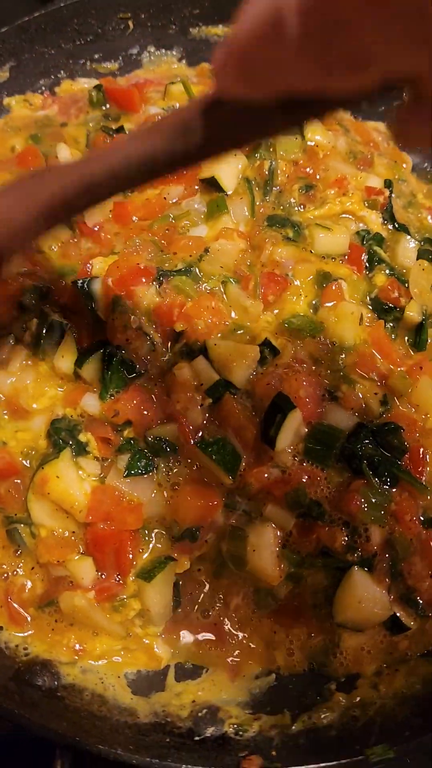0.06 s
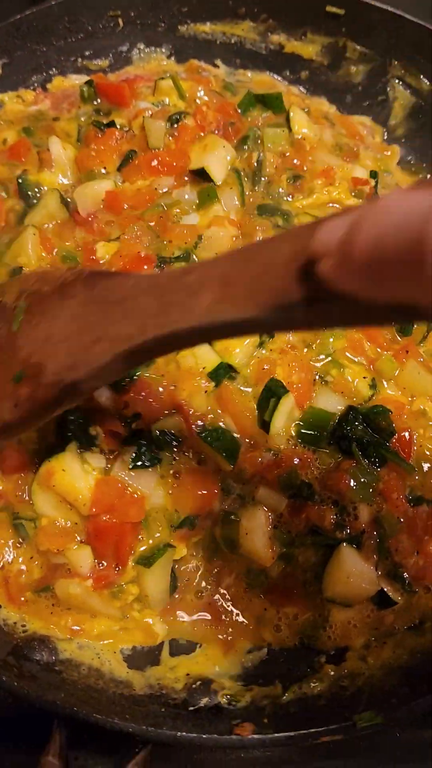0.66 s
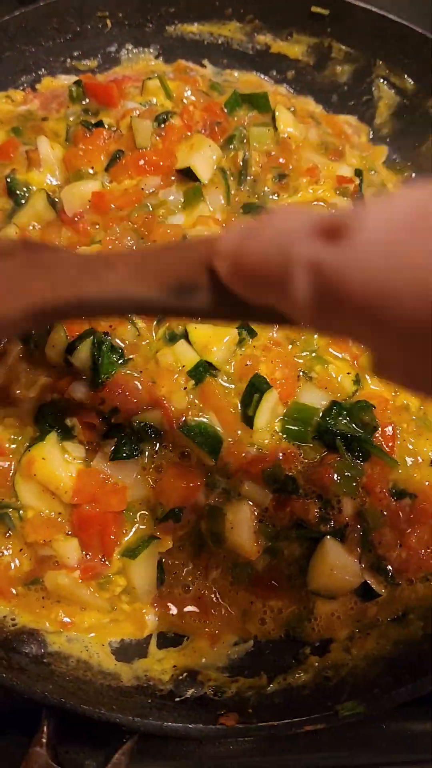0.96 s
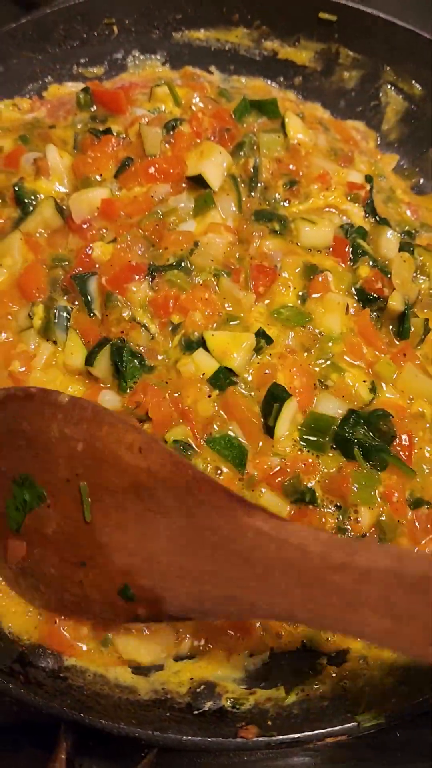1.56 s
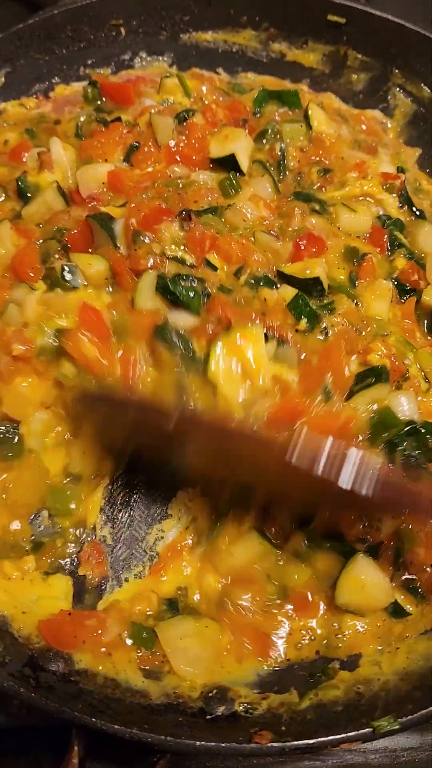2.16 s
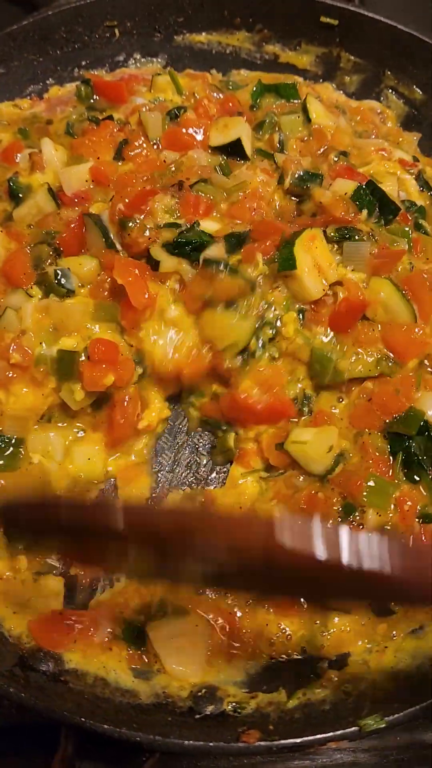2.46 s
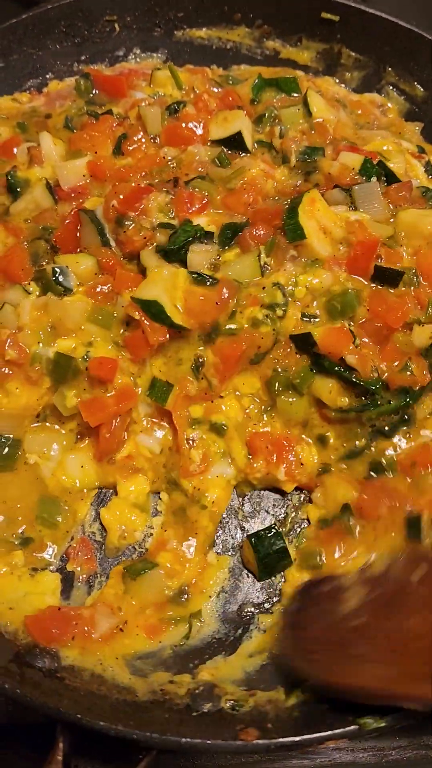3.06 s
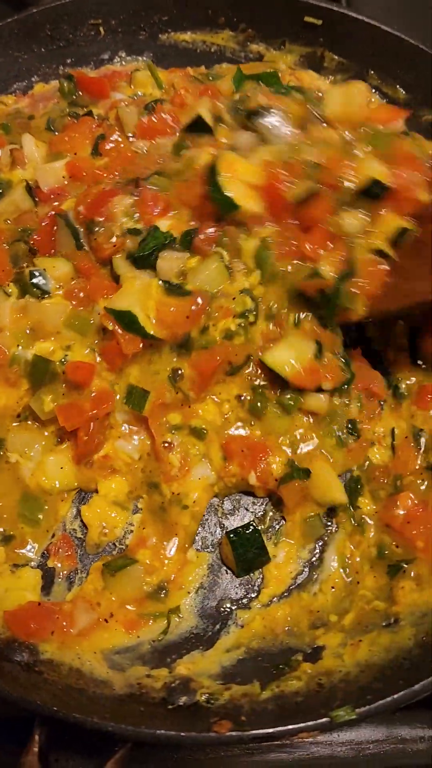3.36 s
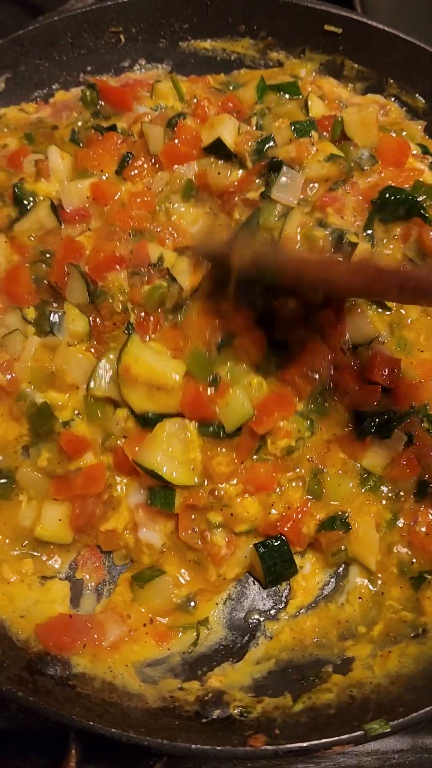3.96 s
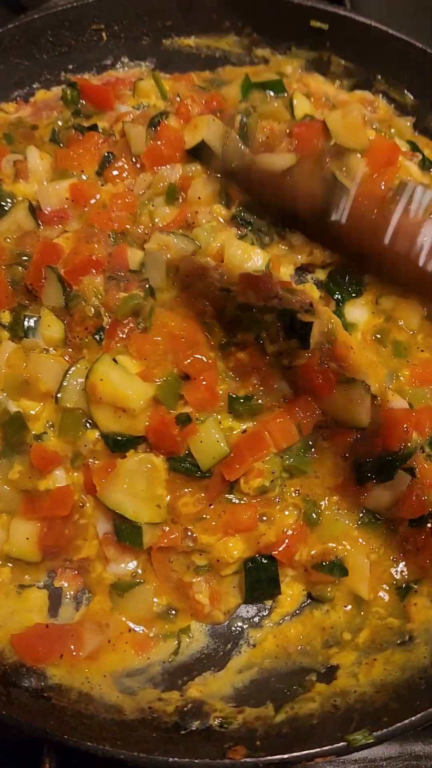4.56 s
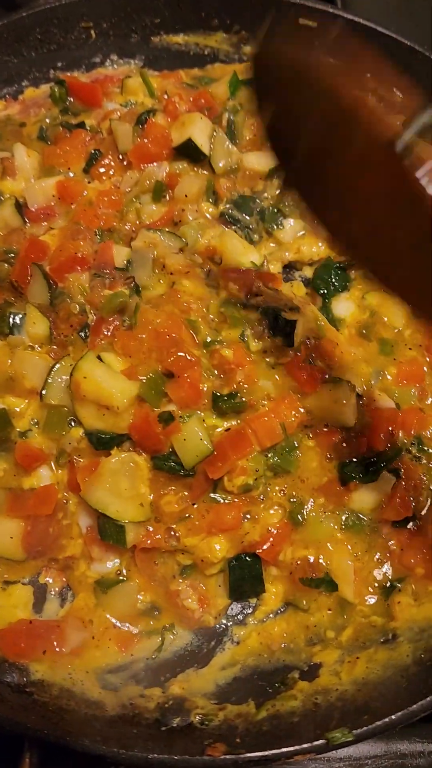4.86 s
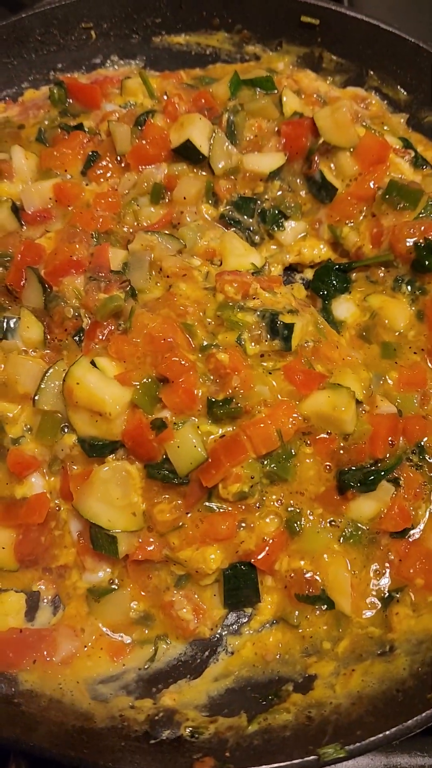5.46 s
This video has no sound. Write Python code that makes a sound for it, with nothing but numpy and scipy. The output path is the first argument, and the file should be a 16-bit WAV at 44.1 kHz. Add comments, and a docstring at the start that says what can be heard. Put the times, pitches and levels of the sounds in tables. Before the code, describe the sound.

Eggs and vegetables sizzle faintly in a frying pan throughout, heard close up in a small kitchen over a low rumble. A wooden spoon thuds dully on the pan floor at the very start and at 0.4 seconds, then more firmly at 0.9. From about 1.3 to 2.9 seconds it scrapes through the food in short strokes, strongest near 2.2, with wet smacks, small rasping catches and brief flares of fizz. Two sharp, loud clacks of wood on the pan stand out at 2.5 and 3 seconds, the second brighter. A short squelch sinks in pitch around 3.2 seconds, and a muffled thud follows at 3.8. From 4 seconds on it is quieter, with soft sputters of steam and tiny bubble pops in the sizzle. At about 5.5 seconds the spoon lands on a hard surface beside the pan with a quick, loud clatter.

```python
"""Stirring eggs in a frying pan

A wooden spoon stirs eggs and vegetables, heard close up in a small kitchen. Its impacts excite damped
modes: it thuds on the pan floor, clacks on the rim and finally clatters down beside the pan. Stick-slip
friction makes it scrape and squelch through the food. Bursting bubbles give a faint sizzle that flares
where egg is pushed onto bare metal, and steam escapes in short sputters over a low rumble."""
import sys
import numpy as np
from scipy import signal
from scipy.fft import rfft, irfft, next_fast_len
from scipy.io import wavfile
from scipy.ndimage import uniform_filter1d, minimum_filter1d

SR = 44100
rng = np.random.default_rng(int(sys.argv[2]) if len(sys.argv) > 2 else 0)


def inscribe(sig):
    """Save sig as 16-bit PCM at rate SR to the path in sys.argv[1].

    A 1-D sig is mono; a 2-D sig holds one channel per row.
    Samples are clipped to [-1, 1] before scaling.
    """
    pcm = np.round(np.clip(np.atleast_2d(sig).T, -1, 1) * 32767)
    wavfile.write(sys.argv[1], SR, pcm.astype(np.int16))


N = 247380

# Blows of the spoon: (time [s], floor level [dB], wall level [dB], spoon level [dB], low-pass [Hz],
# high-pass [Hz], left minus right [dB], right lag [s], scatter gain [dB], pan pitch [ratio])
BLOWS = [(0.005, -22.5, -33, -39, 726, 117, -2.5, 0.00026, -0.5, .95),
         (0.449, -25, -61, -48, 564, 124, -2.5, 0.0003, 0, 1.06),
         (0.9, -18, -22.5, -22, 1694, 158, 0.5, 0.00016, -2.5, 0.99),
         (2.5368, -21.5, -16.5, -13.5, 2620, 236, 1, 0.00042, -6, 1.022),
         (2.9829, -22.5, -20, -5, 7200, 91, -6, 0.00037, -6.5, 0.77),
         (3.7886, -21.5, -27.5, -40.5, 852, 620, -4.5, 0.00033, -7.5, 0.98)]
# Modes of the food-damped pan floor, the pan wall and the spoon: (frequency [Hz], level [dB], T60 [s])
FLOOR_MODES = [(184, 3, 0.01), (431, 0.5, 0.012), (744, -2, 0.011), (160, -29, 0.16), (275, -23, 0.11),
               (365, -20, 0.075), (500, -21, 0.06), (650, -21, 0.05), (760, -21, 0.06), (1130, -26, 0.06)]
WALL_MODES = [(620, -16, 0.06), (925, 0.5, 0.022), (1138, 4, 0.017), (1550, 2.5, 0.011), (1950, -23, 0.065)]
SPOON_MODES = [(1745, -7, 0.048), (2050, 7.5, 0.0068), (2380, 8, 0.0076), (3167, 0.5, 0.014),
               (4250, 5.5, 0.0037), (5140, -10.5, 0.011), (6680, 4.5, 0.0019), (7560, -20, .007)]
# Early reflections from hob and walls: (delay [s], gain [ratio])
REFLECTIONS = [(.0048, 0.046), (0.019, 0.63), (0.0239, 0.2)]
def knocks(thud_t60=0.12, clack_t60=0.052):
    """Impact excitation: each blow rings pan floor, pan wall and spoon, and scatters around the stove."""
    out, echoes = np.zeros((2, 2, N))
    for s, floor_db, wall_db, wood_db, hard_hz, low_hz, side_db, lag, scatter_db, pan_pitch in BLOWS:
        parts = (FLOOR_MODES, floor_db, pan_pitch), (WALL_MODES, wall_db, pan_pitch)
        parts += ((SPOON_MODES, wood_db, 1),)
        blow = sum(amp(db) * ring(modes, hard_hz, low_hz, pitch) for modes, db, pitch in parts)
        blow = stereo(blow, lag)
        scatter = convolve(blow, diffuse_tail([(500, thud_t60), (2200, clack_t60)], size=9000))
        add(out, s, blow * amp([[side_db / 2], [-side_db / 2]]) + amp(scatter_db) * scatter)
    dull = cut(out, 1200, "low", order=3)
    for s, gain in REFLECTIONS:
        add(echoes, s, gain * dull)
    return out + echoes


# Contacts of the dropped spoon: (time [s], level [dB], low-pass [Hz], high-pass [Hz])
REBOUNDS = [(5.5374, -21.5, 1070, 620), (5.545, -14, 6300, 393), (5.558, -18.5, 3370, 149),
            (5.5751, -23.5, 1970, 170), (5.582, -24, 2900, 170)]
# Modes of the hard surface beside the pan: (frequency [Hz], level [dB], T60 [s])
SURFACE_MODES = [(170, -15.5, 0.13), (345, -7.5, 0.052), (640, -5, 0.019), (804, -3, 0.014),
                 (1050, -2.5, 0.0088), (1600, -8.5, 0.024), (2430, -6, 0.011), (3200, -5.5, 0.018),
                 (4160, -2, 0.0077), (5450, 0.5, 0.0037), (7800, 3.5, 0.00096)]
def clatter(scatter_db=-2, scatter_t60=0.13):
    """Rebound: the dropped spoon lands on tip and handle, and each contact rings the surface."""
    out = np.zeros((2, N))
    for s, db, hard_hz, low_hz in REBOUNDS:
        add(out, s, amp(db) * stereo(ring(SURFACE_MODES, hard_hz, low_hz), lag=0.00011))
    return out + amp(scatter_db) * convolve(out, diffuse_tail([(1, scatter_t60)], size=9000))


# Strokes: (time of strongest slip [s], rise [s], fall [s], push [dB], rub [dB], rasp [dB])
STIRS = [(0.636, 0.031, 0.024, -47.5, -54.5, -72), (1.29, 0.11, 0.11, -56, -64, -63.5),
         (1.551, 0.0078, 0.073, -55.5, -88, -64), (1.758, 0.061, 0.073, -52, -45, -51.5),
         (1.97, 0.078, .09, -85, -61.5, -58), (2.209, 0.042, 0.027, -47.5, -32, -37.5),
         (2.338, 0.032, 0.045, -88, -61.5, -52.5), (2.68, 0.061, 0.018, -49.5, -43, -45),
         (3.171, 0.079, 0.11, -49.5, -47.5, -45.5), (4.337, 0.074, 0.09, -66.5, -63, -60.5)]
# Spectra of the push on the pan, the rub on its floor and the wood's rasp: (frequency [Hz], level [dB])
PUSH_SPECTRUM = [(60, -20.5), (150, -1.5), (260, -3.5), (360, -7), (520, -13), (1000, -35)]
RUB_SPECTRUM = [(150, -38.5), (350, -5), (500, -2.5), (690, -3), (900, -13.5), (1300, -5.5), (3500, -51)]
RASP_SPECTRUM = [(400, -33), (1100, -13.5), (1700, -7), (2250, 0), (2800, -14), (4200, -14.5),
                 (7000, -21.5), (11000, -34.5)]
def scrapes(ring_db=-8, push_lead_s=0.033):
    """Stick-slip friction: heavy slips shake the pan, fine ones rasp in the spoon."""
    push_gain, rub_gain, rasp_gain = np.zeros((3, N))
    for s, rise, fall, push_db, rub_db, rasp_db in STIRS:
        force = swell(s, rise, fall)
        leaning = swell(s - push_lead_s, rise, fall)  # the spoon leans on the pan before it slips
        push_gain += amp(push_db) * leaning ** 0.94
        rub_gain += amp(rub_db) * force ** 1.39
        rasp_gain += amp(rasp_db) * force ** 0.97
    push = unit_rms(colour(stereo(clicks(350, 2.5)), PUSH_SPECTRUM))
    slips = stereo(clicks(700, 0.84))
    pan_ring = unit_rms(convolve(slips, ring(FLOOR_MODES, 2500, 1300)))
    rub = unit_rms(unit_rms(colour(slips, RUB_SPECTRUM)) + amp(ring_db) * pan_ring)
    shared, left, right = (clicks(1600, 2.7) for _ in range(3))
    grit = colour(stereo(shared, lag=0.000405) + np.array([left, right]), RASP_SPECTRUM)
    rasp = unit_rms(grit * flicker(3.2, 90))
    return push_gain * push + rub_gain * rub + rasp_gain * rasp


# Wet smacks and bursting bubbles: (time [s], relative level [dB], treble setting [dB])
SMACKS = [(0.075, -32.5, -16.5), (0.158, -26.5, -16), (0.206, -33, -17), (0.403, -39.5, -24),
          (0.447, -31, 18), (0.902, -28.5, -21), (1.1367, -34.5, 7), (1.485, -52, 4), (2.034, -33, -16),
          (2.0928, -33, -7), (2.1417, -18, 5), (2.533, -31, -5), (2.5362, -20, -26.5), (3.462, -40, -12),
          (3.53, -39, -10), (4.05, -42, -29), (4.589, -38, -6), (4.6168, -37.5, -6.5),
          (5.0936, -42.5, -3.5), (5.384, -45, -8)]
def smacks(gain_db=4, length_s=0.011):
    """Impulsive release: wet food smacks and single bubbles burst, each a broadband pulse."""
    out = np.zeros((2, N))
    for s, db, treble_db in SMACKS:
        spectrum = [(300, -6), (1400, -7), (2250, -6.5), (3500, -7.5),
                    (6000, treble_db + 13), (10000, 1.13 * treble_db), (15000, 1.2 * treble_db)]
        add(out, s, amp(db + gain_db) * snap(length_s, spectrum, spray=0.18))
    return out


# Catches of the spoon's edge: (time [s], relative level [dB], length [s], rasp pitch [ratio])
EDGE_CATCHES = [(1.485, -42.5, 0.0075, 1.1), (1.524, -43, 0.048, 1.26), (2.41, -33, 0.029, 1.09),
                (2.654, -43, 0.009, 1.1), (2.673, -26.5, 0.012, 0.85), (2.702, -30.5, 0.011, 1.56),
                (2.754, -42, 0.007, 1.4), (2.813, -36.5, 0.004, 1.1), (2.846, -35, 0.009, 1.14),
                (2.894, -35, 0.0086, 1.1), (3.38, -38, 0.007, 0.73), (3.406, -40, 0.0068, 0.83),
                (3.567, -47, 0.022, 1.1)]
def catches(gain_db=3):
    """Static friction: the spoon's edge catches on the metal and breaks free with a brief rasp."""
    out = np.zeros((2, N))
    for s, db, length, pitch in EDGE_CATCHES:
        spectrum = [(hz * pitch, level) for hz, level in RASP_SPECTRUM]
        add(out, s, amp(db + gain_db) * snap(length, spectrum, spray=0.99))
    return out


# Course of the wet pocket between spoon and pan wall: (time [s], resonance [Hz], level [dB])
POCKET_GLIDE = [(3.07, 2450, -69), (3.095, 2380, -52), (3.135, 2130, -46), (3.18, 1760, -39),
                (3.215, 1800, -53.5), (3.275, 2050, -53), (3.315, 1585, -49), (3.361, 1550, -80)]
def squelch(width_hz=520, stereo_spread=0.56):
    """Cavity resonance: fine wet slips ring a pocket that sinks in pitch as it widens."""
    t = np.arange(N) / SR
    s, hz, db = np.transpose(POCKET_GLIDE)
    shared, left, right = (clicks(1500, 1.5) for _ in range(3))
    slips = stereo(shared, lag=0.00039) + stereo_spread * np.array([left, right])
    pitch = np.interp(t, s, hz) * flicker(0.35, 70)
    pocket = resonate(resonate(slips, pitch, width_hz), pitch, width_hz)
    return amp(np.interp(t, s, db, -np.inf, -np.inf)) * unit_rms(pocket)


# Wet egg pressed onto hot metal: (time [s], rise [s], hold [s], drying time [s], level [dB])
FLARE_UPS = [(0.064, 0.075, 0.083, .07, -49), (0.442, 0.0033, 0.034, .02, -50.5),
             (0.576, 0.025, 0.04, .12, -53.5), (0.914, 0.024, 0.24, .1, -55.5),
             (1.216, 0.051, 0.046, .035, -47.5), (1.365, .015, 0.022, .012, -52),
             (1.475, .01, 0.25, .05, -54.5), (1.708, 0.028, 0.078, .05, -45.5),
             (1.842, 0.043, 0.11, .13, -51.5), (2.095, 0.0074, .13, .11, -47.5),
             (2.528, 0.0055, 0.11, .02, -55), (2.61, 0.05, 0.046, .03, -47),
             (2.752, 0.0288, 0.15, .03, -60.5), (3.072, 0.044, 0.029, .05, -48.5),
             (3.747, 0.016, 0.084, .04, -48.5)]
# Steam forced through the egg: (time [s], half length [s], ring [dB], fizz [dB], vent pitch [ratio])
STEAM_PUFFS = [(1.609, 0.011, -55, -62, 0.99), (4.071, 0.0082, -44.5, -54, 1.01),
               (4.131, 0.022, -63, -62, 1.12), (4.234, 0.013, -56.5, -68, 0.94),
               (4.281, 0.03, -55.5, -64, .98), (4.385, 0.043, -59.5, -59.5, 1.05),
               (4.503, 0.041, -62, -57.5, .98), (4.717, 0.028, -62.5, -59, .98),
               (4.924, 0.034, -64, -63, 1.02), (5.222, 0.033, -69, -67, 0.97)]
# Hollow modes of the steam vents: (frequency [Hz], level [dB], T60 [s])
VENT_MODES = [(2420, -4, 0.026), (3320, 1, 0.019), (4490, -1, 0.012), (5780, 3.5, 0.007), (7410, 5, 0.009)]
# Filters for the steady simmer and the flaring fizz: (frequency [Hz], level [dB])
SIMMER_SPECTRUM = [(700, 1.5), (1500, -7), (2200, -1.5), (3800, -4.5), (6200, 1.5), (8300, -3.5),
                   (10200, -14.5), (12500, -10.5), (16000, -16.5)]
FIZZ_SPECTRUM = [(700, -17), (2150, -1), (3700, -7), (6300, -2.5), (7500, -3.5), (10000, -16.5),
                 (12500, -10), (15500, -13.5)]
# Brief dips in the sizzle: (time [s], half length [s], gain [dB])
SIZZLE_DIPS = [(0.835, 0.043, -8), (1.453, 0.014, -1.5), (2.095, 0.01, -4), (2.5, 0.033, -7),
               (3.98, 0.012, -1.5)]
def frying(simmer_db=-60.5):
    """Boiling: bubbles burst steadily, wet egg flares on hot metal, and escaping steam rings its vents."""
    t = np.arange(N) / SR
    fizz_gain, vents = np.zeros(N), np.zeros((2, N))
    for s, rise, hold, drying, db in FLARE_UPS:
        wetting = np.clip((t - s) / rise, 0, 1)
        fizz_gain += amp(db) * wetting * np.exp(-np.maximum(t - s - rise - hold, 0) / drying)
    spit = bubbles(9000, 2, cycles=1)
    for s, half_length, vent_db, fizz_db, pitch in STEAM_PUFFS:
        steam = plateau(s, half_length)
        fizz_gain += amp(fizz_db) * steam
        hollow = convolve(spit, ring(VENT_MODES, 8500, 2300, pitch, size=2000))
        vents += amp(vent_db) * steam * unit_rms(hollow)
    simmer = colour(bubbles(14000, 2.9, cycles=1.5), SIMMER_SPECTRUM)
    simmer = unit_rms(clustered(simmer, 1.4) * flicker(1, 20))
    fizz = colour(bubbles(14000, 3, cycles=2.5), FIZZ_SPECTRUM)
    fizz = unit_rms(clustered(fizz, 2.8) * flicker(1.5, 70))
    lull = amp(sum(db * plateau(s, half_length) for s, half_length, db in SIZZLE_DIPS))
    return lull * (amp(simmer_db) * simmer + fizz_gain * fizz) + vents


def bubbles(per_s, spread_db, cycles, pitches=20):
    """Damped oscillation: tiny random bursts of many pitches, each falling to 1/e in the given cycles."""
    t, out = np.arange(200) / SR, np.zeros((2, N))
    for hz in np.geomspace(1300, 15500, pitches):
        phase = rng.uniform(-2.93, 2.82, (2, 1))
        burst = hz * np.exp(-hz * t / cycles) * np.cos(2 * np.pi * hz * t + phase)
        out += signal.oaconvolve(clicks(per_s / pitches, spread_db)[None], burst, axes=1)[:, :N]
    return unit_rms(out)


def clustered(x, depth_db, size=8):
    """Band modulation: bubbles of like size burst together, in patches of roughly 1 kHz by 25 ms."""
    spectra = signal.stft(x, nperseg=256)[2]
    noise = rng.standard_normal(spectra.shape[1:])
    patches = unit_rms(uniform_filter1d(uniform_filter1d(noise, size, axis=0), size, axis=1))
    return signal.istft(spectra * amp(depth_db * patches), nperseg=256)[1][:, :N]


# Spectrum of the stove and kitchen background: (frequency [Hz], level [dB])
RUMBLE_SPECTRUM = [(20, -12.5), (65, -3), (115, -14), (300, -23.5), (470, -32), (800, -32), (1500, -39.5),
                   (3000, -59)]
def rumble(level_db=-55.5, stereo_spread=0.062):
    """Ambient noise: a low rumble, nearly coherent between the two channels."""
    air = stereo(rng.standard_normal(N)) + stereo_spread * rng.standard_normal((2, N))
    return amp(level_db) * unit_rms(colour(air, RUMBLE_SPECTRUM))


def ring(modes, hard_hz, low_hz, pitch=1, size=22000):
    """Modal superposition, neighbours in antiphase, peak 1; a softer blow has a lower cutoff hard_hz."""
    t = np.arange(size) / SR
    sagging = pitch * t * (1 - 0.3 * t)  # the pitch sinks as the pressure eases
    x = sum((-1) ** k * amp(db - 60 * t / t60) * np.sin(2 * np.pi * hz * sagging)
            for k, (hz, db, t60) in enumerate(modes))
    x = cut(cut(x, hard_hz, "low"), low_hz, "high")
    x = cut(x, 7800, "low", order=6)
    return x / abs(x).max()


def snap(length, spectrum, spray, size=3000):
    """Transient of peak 1: a sharp release followed by a dying spray of smaller ones."""
    t = np.arange(size) / SR
    impulse = stereo(1. * (t == 0), lag=0.00005)
    noise = rng.standard_normal((2, size)) * np.exp(-np.log(30) * t / length)
    x = colour(impulse + spray * noise, spectrum)
    return x / abs(x).max()


def diffuse_tail(t60s, size=30000, spacing=12):
    """Reverberant decay: sparse reflections of random sign, each band dying at its own rate."""
    taps = np.zeros((2, size))
    at = np.arange(5 * spacing, size - spacing, spacing)
    at = at + rng.integers(0, spacing, (2, len(at)))
    np.put_along_axis(taps, at, rng.choice([-1., 1.], at.shape), 1)
    hz, t, spectra = signal.stft(taps, SR, nperseg=256)
    coherence = (1 / (1 + (hz / 900) ** 2))[:, None]  # the bass is alike on both sides
    spectra[1] = coherence * spectra[0] + np.sqrt(1 - coherence ** 2) * spectra[1]
    out = signal.istft(spectra * amp(-60 * t / curve(t60s, hz)[:, None]), SR, nperseg=256)[1]
    return out / np.linalg.norm(out[0])


def clicks(per_s, spread_db):
    """Poisson process: random impulses, most small and a few large."""
    impulses = (rng.random(N) < per_s / SR) * rng.choice([-1, 1], N)
    return impulses * amp(spread_db * np.minimum(rng.exponential(1, N), 4.5))


def flicker(depth_db, per_s):
    """Random modulation: a factor that wanders about 1."""
    return amp(depth_db * np.interp(np.arange(N) * per_s / SR, np.arange(2000), rng.standard_normal(2000)))


def swell(s, rise, fall):
    """Exponential growth to 1 at time s, then exponential decay."""
    t = np.arange(N) / SR - s
    return np.exp(-np.minimum(np.maximum(-t / rise, t / fall), 40))


def plateau(s, half_length):
    """Super-Gaussian window: a flat-topped gain around time s."""
    return np.exp(-np.minimum(((np.arange(N) / SR - s) / half_length) ** 4, 40))


def resonate(x, hz, width_hz):
    """Swept resonance of gain 1 that follows the curve hz."""
    carrier = np.exp(2j * np.pi * np.cumsum(hz) / SR)
    pole = np.exp(-np.pi * width_hz / SR)
    return 2 * (carrier * signal.lfilter([1 - pole], [1, -pole], x / carrier)).real


def stereo(x, lag=0.00024):
    """Path difference: the sound reaches the right channel lag seconds after the left."""
    x = np.ravel(x)
    size = next_fast_len(len(x) + 100)
    delay = np.exp(-2j * np.pi * lag * np.fft.rfftfreq(size, 1 / SR))
    return np.array([x, irfft(rfft(x, size) * delay, size)[:len(x)]])


def colour(x, spectrum, size=4096):
    """Minimum-phase filtering to the given spectrum."""
    db = curve(spectrum, abs(np.fft.fftfreq(size, 1 / SR)))
    log_gain = np.log(amp(np.maximum(db, -100)))
    response = np.fft.ifft(np.exp(np.conj(signal.hilbert(log_gain)))).real
    return convolve(x, response[:size // 2])


def cut(x, hz, kind, order=2):
    """Maximally flat low-pass or high-pass filtering."""
    return signal.sosfilt(signal.butter(order, hz, kind, fs=SR, output="sos"), x)


def convolve(x, response):
    """Convolution with an impulse response, kept to the length of x."""
    return signal.fftconvolve(np.atleast_2d(x), np.atleast_2d(response), axes=1)[:, :x.shape[-1]]


def add(mix, s, sound):
    """Superposition of a sound onto the mix from time s."""
    part = mix[:, round(s * SR):][:, :sound.shape[-1]]
    part += sound[..., :part.shape[1]]


def curve(points, hz):
    """Interpolation along a logarithmic frequency axis."""
    frequency, value = np.transpose(points)
    return np.interp(np.log(hz + 1), np.log(frequency + 1), value)


def unit_rms(x):
    """Normalisation to unit power."""
    return x / np.sqrt(np.mean(x ** 2) + 1e-20)


def amp(db):
    """Amplitude ratio of a level in decibels."""
    return 10 ** (np.asarray(db) / 20)


# Reverberation time of the kitchen: (frequency [Hz], T60 [s])
KITCHEN_DECAY = [(100, 0.74), (400, 0.35), (1500, 0.47), (5000, 0.41), (14000, 0.084)]
def scene(bass_room_db=-9, room_db=-22, food_room_db=-11):
    """Superposition: direct sound of spoon and food, their reverberation, and the rumble."""
    spoon = knocks() + clatter() + scrapes()
    food = smacks() + catches() + frying() + squelch()
    to_room = amp(bass_room_db) * cut(spoon, 916, "low") + amp(room_db) * spoon + amp(food_room_db) * food
    return spoon + food + convolve(to_room, diffuse_tail(KITCHEN_DECAY)) + rumble()


def limit(x, ceiling=0.92, size=61):
    """Peak limiting: a fast, smooth gain dip holds the loudest clacks under full scale."""
    gain = 1 / np.maximum(abs(x).max(0) / ceiling, 1)
    return x * uniform_filter1d(minimum_filter1d(gain, 2 * size), size)


# Level difference between the microphone's ports: (frequency [Hz], left minus right [dB])
PORT_BALANCE = [(100, 1.5), (380, 1.1), (700, 2), (1290, 8), (2380, -3), (4400, -2.5), (8100, -1),
                (11000, 9.5), (15000, 13.5)]
def record(dry):
    """Frequency response: each port colours the sound; peak limiting and a 16.1 kHz low-pass follow."""
    side_db = curve(PORT_BALANCE, np.fft.rfftfreq(2 * N, 1 / SR))
    coloured = irfft(rfft(dry, 2 * N) * amp(np.array([side_db, -side_db]) / 2))[:, :N]
    low_pass = signal.firwin(401, 16100, window=("kaiser", 8), fs=SR)
    return signal.oaconvolve(limit(coloured), low_pass[None], "same")


dry = scene()
out = record(dry)
inscribe(out)
```